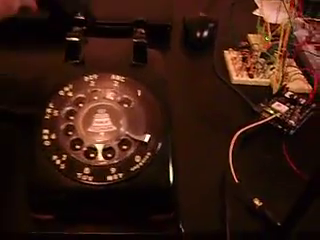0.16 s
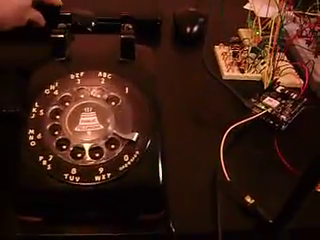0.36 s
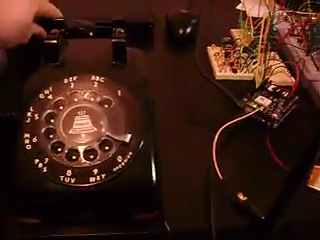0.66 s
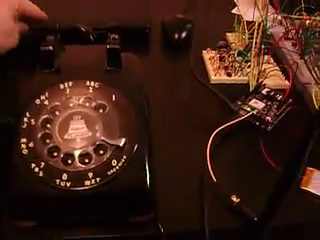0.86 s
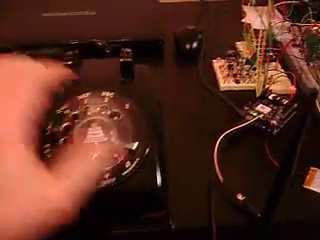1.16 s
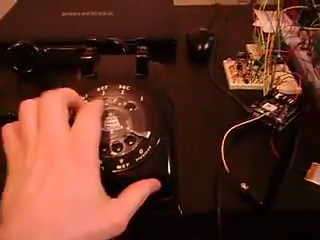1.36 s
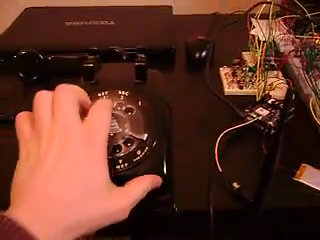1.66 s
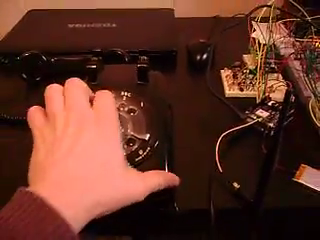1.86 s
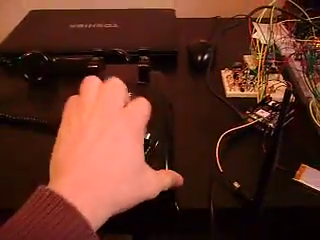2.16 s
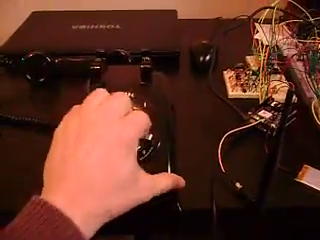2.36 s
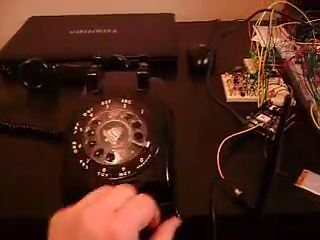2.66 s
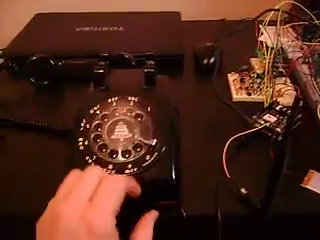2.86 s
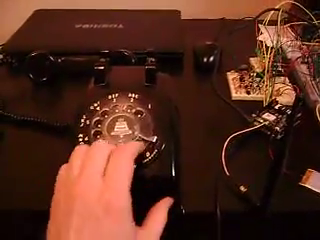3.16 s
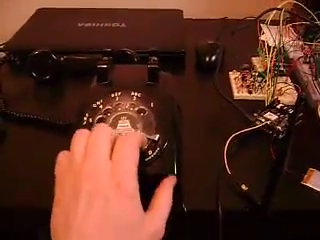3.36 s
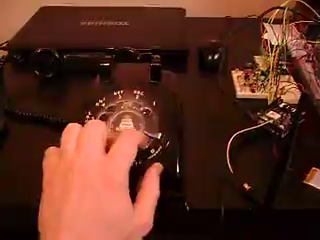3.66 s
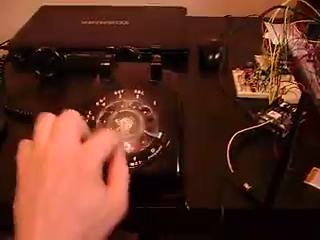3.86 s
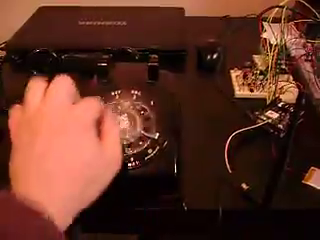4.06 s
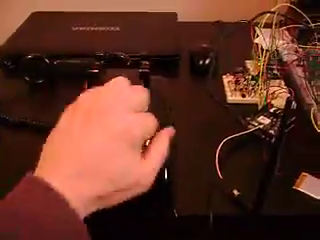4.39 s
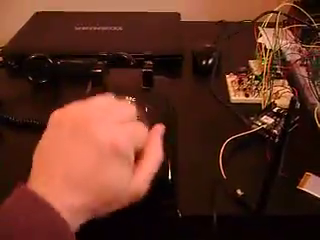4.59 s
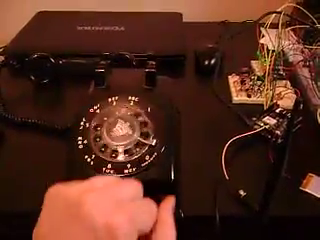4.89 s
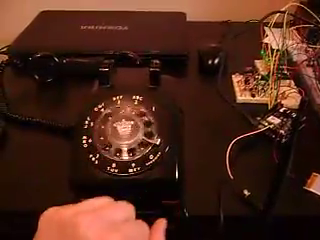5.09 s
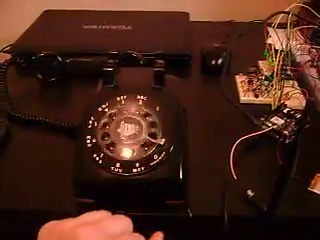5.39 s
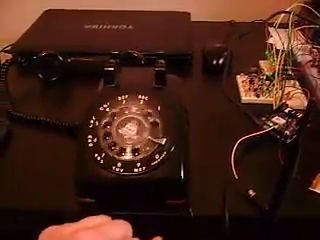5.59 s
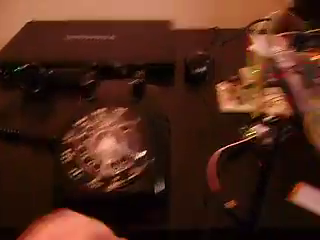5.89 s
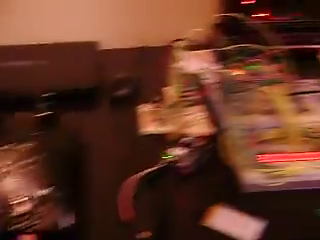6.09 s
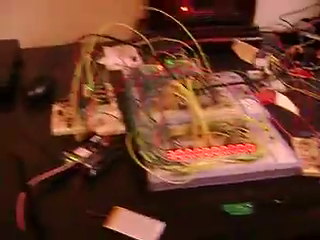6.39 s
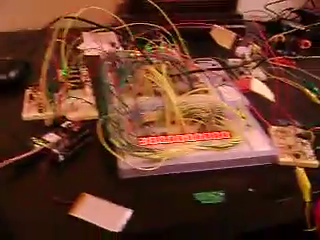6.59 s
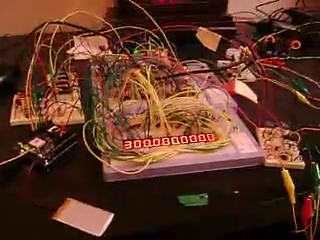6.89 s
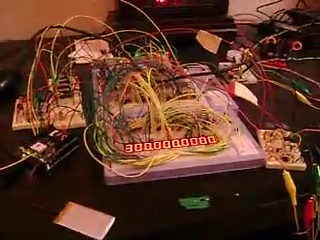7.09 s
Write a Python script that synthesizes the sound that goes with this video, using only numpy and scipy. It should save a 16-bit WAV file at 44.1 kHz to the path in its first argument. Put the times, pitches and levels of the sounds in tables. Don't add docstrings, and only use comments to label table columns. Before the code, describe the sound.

A telephone handset is lifted and crashes onto a wooden desk, then a rotary dial is wound and whirrs back twice, ticking, over a fan's hum.

```python
import sys
import numpy as np
from scipy import signal
from scipy.fft import rfft, irfft, next_fast_len
from scipy.io import wavfile

SR = 44100
rng = np.random.default_rng(int(sys.argv[2]) if len(sys.argv) > 2 else 0)


def unload_wav(signal):
    wavfile.write(
        sys.argv[1],
        SR,
        np.round(np.clip(np.atleast_2d(signal).T, -1, 1) * 32767).astype(np.int16),
    )


def how_loud(loudness_db):
    steps = np.asarray(loudness_db, float) / 20
    return 10 ** steps


N = 319284

# t/s, desk top peak level/dB, shell level/dB, crack level/dB
HANDSET_BLOWS = [(.505, -2, -4.5, -4.5), (.511, -4.5, -14, -17), (0.543, -6.5, 0, -11),
                 (.547, -7.5, -7, -4.5), (.571, -5, -9, -4.5), (.583, -3.5, -5, -17), (.595, -3, -23, -9),
                 (0.608, -4, -10.5, -18), (0.635, -11.5, -22, -18.5), (.669, -15, -38, -23.5),
                 (0.7957, 5, -12, 1), (.800, 10.5, -16.5, 9), (.809, 0.5, -10, -14), (.819, 6.5, -10, -12),
                 (.829, 0.5, -1.5, -4.5), (0.848, -3, -15, -11.5), (0.87, -8.5, -18, -26),
                 (.919, -29, -26, -25.5)]
# f/Hz, level/dB, T60/s
DESK_MODES = [(303, -22, 0.06), (372.4, -0.5, .13), (419.2, 5, 0.076), (482.6, -3.5, 0.11),
              (530, -13, 0.035), (583, -12.5, 0.17), (700, -16.5, 0.082)]
# f/Hz, level/dB, T60/s
SHELL_MODES = [(800, -27, 0.042), (970, -2.5, 0.039), (984, 9, 0.052), (1025, -3, 0.077),
               (1115, 6.5, 0.051), (1178, -11.5, 0.097), (1226, -24.5, 0.061), (1730, -19.5, 0.081),
               (2230, -17, 0.035)]
# t/s, level/dB, decay/(dB/s), scrape level above it/dB
ROCKS = [
    (.545, -8.5, 211, -18.5),
    (.8, -6, 343, -26),
]
SLIDE_S, SLIDE_TOP_S = (.73, .794), .778
SLIDE_DB, SLIDE_RISE_DB_PER_S, SLIDE_SCRAPE_DB = -19, 450, -9
ROCK_TAIL_DB, ROCK_TAIL_DB_PER_S = -35, 43

# t/s, peak level/dB, kind of stop
DIAL_STOPS = [
    (2.262, -29.5, "finger"),
    (2.307, -35.5, "slip"),
    (2.5, -18, "release"),
    (2.891, -15.5, "end"),
    (4.431, -25.5, "finger"),
    (4.455, -37, "slip"),
    (4.47, -39.5, "slip"),
    (4.639, -35, "release"),
    (5.761, -16.5, "end"),
]
STOP_KINDS = {"finger": (-9.5, 4.5, -22, -40), "slip": (-12, 7.5, -17.5, -17),
              "release": (-34, 1, -23.5, -19.5), "end": (-14, 2.5, -11.5, -18.5)}
# f/Hz, width/Hz, level/dB
PLATE_PEAKS = [(938, 58, 1), (1031, 190, 3), (800, 360, -1.5), (1204, 106, -7)]
# f/Hz, width/Hz, level/dB
HOUSING_PEAKS = [(445, 61, 0.5), (512, 20, -10), (659, 41, 2)]
# f/Hz, width/Hz, level/dB
SPRING_PEAKS = [(2215, 120, 11.5), (2554, 200, 10.5), (3900, 170, -14.5), (3880, 250, 1),
                (5130, 280, -17.5)]

# t/s, knock level/dB, sharp part level/dB
RATCHET_CATCHES = [(1.979, -40.5, -51), (2.121, -29.5, -50), (2.133, -44, -38), (2.145, -23, -39),
                   (2.163, -31, -37), (2.176, -24, -39), (2.22, -28, -54), (3.888, -34, -45),
                   (3.925, -31, -61), (3.955, -28, -43.5), (4.031, -52, -45), (4.109, -35.5, -58),
                   (4.135, -31, -45), (4.162, -24.5, -45), (4.208, -30.5, -47), (4.252, -25.5, -43.5),
                   (4.271, -22.5, -47), (4.297, -31, -59), (4.321, -39.5, -51.5), (4.366, -28, -43.5),
                   (4.385, -28, -44), (4.401, -27, -41.5)]
CATCH_HOUSING_DB, PAWL_HZ = -15, (2250, 2660)
# t after wipe/s, plate level/dB, housing level/dB, ping level/dB, ping f/Hz
CAM_CONTACTS = [
    (.006, -43, -40, -50, 2540),
    (.032, -39.5, -32.5, -47.5, 2460),
    (.08, -38.5, -33.5, -42, 2250),
]
PULSE_S, LAST_PULSE_S, SPIN_UP_S = .1021, .156, .12
WIPE_DB, ODD_PULSE_DB, CONTACT_SPREAD_DB = -42, -2, 2
REBOUND_S, REBOUND_DB, REBOUND_HOUSING_DB = (.027, .09), (-28, -36), -5
# t/s, housing level/dB, ping level/dB
RETURN_KNOCKS = [(2.646, -35, -48.5), (2.818, -37, -54), (4.646, -57, -37), (5.171, -34, -36),
                 (5.379, -32, -41), (5.433, -31, -52), (5.497, -30.5, -42.5), (5.511, -33.5, -48),
                 (5.584, -43, -35), (5.635, -41, -37.5), (5.738, -30, -54)]
RETURN_KNOCK_PLATE_DB = 2.5

# start t/s, end t/s, whirr level/dB, housing level above it/dB
DIAL_WINDS = [
    (2.09, 2.33, -48.5, -9),
    (3.865, 4.49, -47, -7),
]
# start t/s, end t/s, whirr level/dB, housing level above it/dB
DIAL_RETURNS = [
    (2.467, 2.898, -47, 1.5),
    (4.623, 5.763, -47.5, -3),
]
RASP_DB, LURCH_DB, LURCH_S = -1.5, 14, .019
WIND_SWELL_DB, BRAKE_DB, BRAKE_S = 4.5, 20, .018
HOUSING_GROWS_DB_PER_S = 1.5

# t/s, peak level/dB, edge level/dB, edge f/Hz
CASE_TAPS = [(0.093, -24.5, -30, 2080), (0.103, -33, -42, 2250), (1.385, -25, -29, 2500),
             (1.396, -28, -34.5, 2700), (1.41, -29, -42, 2940), (2.09, -35, -42, 2260),
             (3.286, -31, -41, 2450), (3.515, -37, -57, 2470), (7.127, -37, -35.5, 2970)]

# f/Hz, level/dB per Hz
AIR_SPECTRUM = [(25, -24), (53, -27.5), (145, -6), (300, -5.5), (480, -7.5), (900, -8), (1250, -17),
                (4800, -24.5)]
AIR_DB = -46
# f/Hz, width/Hz, level/dB
DUCT_SHAPE = [
    (277, 12, -9),
    (297, 12, 7.5),
]
# f/Hz, rms level/dB
FAN_TONES = [(59.2, -72.5), (118.4, -78.5), (236.9, -60), (296.1, -70), (409.1, -63.5), (468.3, -61.5),
             (683.7, -62.5), (1061, -70.5), (1179, -68)]
ROOM_T60_S, ROOM_DB = .31, -8.5
# f/Hz, level/dB
CONVERTER_ROLLOFF = [(4600, 0.5), (5200, 1.5), (5600, -6.5), (6000, -19), (6300, -42.5), (6600, -98.5)]


def handset():
    s, desk_db, shell_db, crack_db = np.transpose(HANDSET_BLOWS)
    desk = strike(s, desk_db, .0013, .00024, lambda x: modes(x, DESK_MODES))
    shell = strike(s, shell_db, .00067, .00026, lambda x: modes(x, SHELL_MODES))
    crack = strike(s, crack_db - 2, .0038, .00035, lambda x: band(x, 1300, 6400, order=1))
    thud = strike(s, desk_db - 27, .008, .00061, lambda x: band(x, 110, 200))
    hollow_gain, bright_gain = rocking()
    chatter = grains(1500, 4)
    hollow = rms_one(modes(chatter, DESK_MODES)) + .58 * rms_one(modes(chatter, SHELL_MODES))
    scrape = rms_one(band(chatter, 2100, 6000, order=1))
    return thud + desk + shell + crack + how_loud(-.5) * hollow_gain * hollow + how_loud(-2) * bright_gain * scrape


def rocking():
    since, _, gate = window(*SLIDE_S, .01)
    before_top = np.maximum(SLIDE_TOP_S - SLIDE_S[0] - since, 0)
    hollow = gate * how_loud(SLIDE_DB - SLIDE_RISE_DB_PER_S * before_top)
    bright = how_loud(SLIDE_SCRAPE_DB) * hollow
    for s, db, fall_db_per_s, scrape_db in ROCKS:
        since, _, gate = window(s, s + .171, .01)
        fall = how_loud(-fall_db_per_s * since) + how_loud(ROCK_TAIL_DB - ROCK_TAIL_DB_PER_S * since)
        rock = gate * how_loud(db) * fall
        hollow = hollow + rock
        bright = bright + how_loud(scrape_db) * rock
    return hollow, bright


def clacks():
    s, db = np.transpose([row[:2] for row in DIAL_STOPS])
    housing_db, crack_db, latch_db, thump_db = db + np.transpose([STOP_KINDS[row[2]] for row in DIAL_STOPS])
    plate = strike(s + .00288, db + 2, .0081, .00054,
                   lambda x: how_loud(-14) * body(x, PLATE_PEAKS) + band(x, 470, 870))
    housing = strike(s + .00289, housing_db + 8.5, .0064, .00034, lambda x: body(x, HOUSING_PEAKS))
    crack = strike(s, crack_db - .5, .011, .0012, lambda x: band(x, 900, 6800, order=1))
    latch = strike(s, latch_db + 11.5, .0011, .00025,
                   lambda x: ring(x, 2660, .035) + .21 * ring(x, 4950, .037))
    thump = strike(s + .0035, thump_db + .3, .034, .003, lambda x: band(x, 80, 280))
    return plate + housing + crack, latch + thump


def ticks():
    return ratchet() + cam() + return_knocks()


def ratchet():
    s, db, sharp_db = np.transpose(RATCHET_CATCHES)
    out = knock(s, db, db + CATCH_HOUSING_DB) + wipe(s, sharp_db)
    for k, hz in enumerate(PAWL_HZ):
        out += ping(s[k::2], sharp_db[k::2], hz)
    return out


def cam():
    (pulses, odd_db), stops = cam_pulses()
    out = wipe(pulses, WIPE_DB - .5 + CONTACT_SPREAD_DB * rng.standard_normal(len(pulses)))
    for k, (lag_s, plate_db, housing_db, ping_db, hz) in enumerate(CAM_CONTACTS):
        luck_db = CONTACT_SPREAD_DB * rng.standard_normal(len(pulses)) + odd_db * (k == 2)
        out += knock(pulses + lag_s, plate_db + luck_db, housing_db + luck_db)
        out += ping(pulses + lag_s - .006, ping_db + luck_db, hz)
    for lag_s, db in zip(REBOUND_S, REBOUND_DB):
        plate_db = np.full(len(stops), db)
        out += knock(stops + lag_s, plate_db, plate_db + REBOUND_HOUSING_DB)
    return out


def cam_pulses():
    stops = [s for s, _, kind in DIAL_STOPS if kind == "end"]
    pulses = []
    for stop, row in zip(stops, DIAL_RETURNS):
        last = stop - LAST_PULSE_S
        count = int((last - row[0] - SPIN_UP_S) / PULSE_S) + 1
        pulses += [(last - k * PULSE_S, ODD_PULSE_DB * (k % 2)) for k in range(count)]
    return np.transpose(pulses), np.array(stops)


def return_knocks():
    s, housing_db, ping_db = np.transpose(RETURN_KNOCKS)
    return knock(s, housing_db + RETURN_KNOCK_PLATE_DB, housing_db) + ping(s, ping_db, PAWL_HZ[1])


def knock(s, plate_db, housing_db):
    plate = strike(s, plate_db - 3.5, .0013, .0087, lambda x: body(x, PLATE_PEAKS))
    return plate + strike(s, housing_db - 3, .0075, .004, lambda x: body(x, HOUSING_PEAKS))


def ping(s, db, hz):
    return strike(s, db, .0015, .001, lambda x: ring(x, hz, .021))


def wipe(s, db):
    return strike(s, db + 5.5, .0043, .011, lambda x: band(x, 2500, 6300))


def gears():
    plate_gain, housing_gain, rasp_gain = whirr()
    teeth = grains(1500, 2.5) * how_loud(.5 * drift(30))
    plate = rms_one(body(teeth, PLATE_PEAKS))
    housing = rms_one(body(teeth, HOUSING_PEAKS))
    rasp = rms_one(body(teeth, SPRING_PEAKS)) + 2.5 * rms_one(band(teeth, 1500, 12000, order=1))
    return plate_gain * plate + housing_gain * housing + rasp_gain * rms_one(rasp)


def whirr():
    out = 0
    for rows, end_db, end_s in ((DIAL_WINDS, WIND_SWELL_DB, .1), (DIAL_RETURNS, BRAKE_DB, BRAKE_S)):
        for start, end, db, housing_db in rows:
            since, until, gate = window(start, end, .03)
            load_db = LURCH_DB * np.exp(-since / LURCH_S) + end_db * np.exp(-until / end_s)
            growth_db = HOUSING_GROWS_DB_PER_S * np.minimum(since, end - start)
            plate = db + load_db
            housing = db + housing_db + .71 * load_db + growth_db
            rasp = db + RASP_DB + 1.3 * load_db
            out = out + gate * how_loud([plate, housing, rasp])
    return out


def taps():
    s, db, edge_db, edge_hz = np.transpose(CASE_TAPS)
    out = strike(s, db - 3, .0055, .0002, lambda x: band(x, 710, 1170))
    out += strike(s, edge_db, .0092, .001, lambda x: band(x, 1100, 6000, order=1))
    for at, level_db, hz in zip(s, edge_db, edge_hz):
        out += strike([at], [level_db - 5.5], .0021, .001, lambda x: ring(x, hz, .021))
    return out


def fan():
    hz, t = np.fft.rfftfreq(N, 1 / SR) + 1, np.arange(N) / SR
    air_hz, air_db = np.transpose(AIR_SPECTRUM)
    shape_db = np.interp(np.log(hz), np.log(air_hz), air_db)
    for at_hz, width_hz, db in DUCT_SHAPE:
        shape_db = shape_db + db * np.exp(-((hz - at_hz) / width_hz) ** 2)
    air = rms_one(irfft(how_loud(shape_db) * rfft(rng.standard_normal(N)), N))
    out = how_loud(AIR_DB - 2.5 + .46 * drift(3.3)) * air
    wander = np.cumsum(.00307 * drift(1.43)) / SR
    for tone_hz, db in FAN_TONES:
        tone = np.sin(2 * np.pi * (tone_hz * (t + wander) + rng.random()))
        out += np.sqrt(2) * how_loud(db + 2.04 * drift(5.1)) * tone
    return out


def room(x):
    t = np.arange(SR // 2) / SR
    tail = rng.standard_normal(len(t)) * how_loud(-60 * t / ROOM_T60_S) * np.clip(t / .0037 - .3, 0, 1)
    return how_loud(ROOM_DB) * signal.fftconvolve(x, tail / np.linalg.norm(tail))[:N]


def strike(times_s, db, length_s, rise_s, colour):
    out, t = np.zeros(N), np.arange(round(.2 * SR)) / SR
    envelope = np.exp(-t / length_s) * np.minimum(t / rise_s, 1)
    bursts = colour(rng.standard_normal((len(times_s), len(t))) * envelope)
    for s, gain, burst in zip(times_s, how_loud(db), bursts):
        start = round(s * SR)
        part = out[start:start + len(t)]
        part += gain * burst[:len(part)] / np.abs(burst).max()
    return out


def grains(per_s, spread_db):
    hits = rng.random(N) < per_s / SR
    return hits * how_loud(spread_db * np.minimum(rng.exponential(1, N), 4)) * rng.choice([-1, 1], N)


def ring(force, hz, t60_s):
    r, w = how_loud(-60 / (t60_s * SR)), 2 * np.pi * hz / SR
    return signal.lfilter([0, np.sin(w)], [1, -2 * r * np.cos(w), r * r], force + 1e-18)


def modes(force, table):
    return band(sum(how_loud(db) * ring(force, hz, t60_s) for hz, db, t60_s in table), 287, 6000)


def body(force, peaks):
    out = 0
    for k, (hz, width_hz, db) in enumerate(peaks):
        t60_s = np.log(1000) / (np.pi * width_hz)
        out = out + (-1) ** k * how_loud(db) * ring(force, hz, t60_s)
    return out


def window(start_s, end_s, fade_s):
    t = np.arange(N) / SR
    since, until = t - start_s, end_s - t
    gate = np.clip(np.minimum(since, until) / fade_s, 0, 1)
    return np.maximum(since, 0), np.maximum(until, 0), gate


def drift(rate_hz):
    r = np.exp(-2 * np.pi * rate_hz / SR)
    return rms_one(signal.lfilter([1], [1, -2 * r, r * r], rng.standard_normal(N + SR))[SR:])


def band(x, low_hz, high_hz, order=2):
    return signal.sosfilt(signal.butter(order, [low_hz, high_hz], "band", fs=SR, output="sos"), x)


def rms_one(x):
    return x / np.sqrt(np.mean(x ** 2) + 1e-20)


def scene():
    stops, close = clacks()
    desk = handset() + stops + taps() + band(ticks() + gears(), 240, 11000)
    return (band(desk + room(desk), 160, 5900, order=1) + close + fan())[None]


def band_limit(x):
    return signal.sosfilt(signal.butter(12, 16980, fs=SR, output="sos"), x)


def record(dry):
    clip_top, edge_top = .688, .718
    size = next_fast_len(N + 2048)
    low = how_loud(np.interp(np.fft.rfftfreq(size, 1 / SR), *np.transpose(CONVERTER_ROLLOFF)))
    x = irfft(low * rfft(np.clip(dry, -clip_top, clip_top), size), size)[:, :N]
    x = np.clip(x, -edge_top, edge_top)
    x = signal.sosfilt(signal.butter(8, 15800, fs=SR, output="sos"), x)
    return band_limit(x)


dry = scene()
out = record(dry)
unload_wav(out)
```